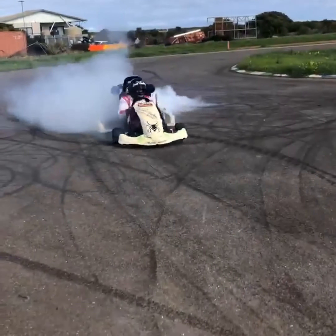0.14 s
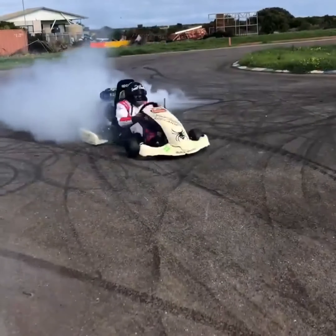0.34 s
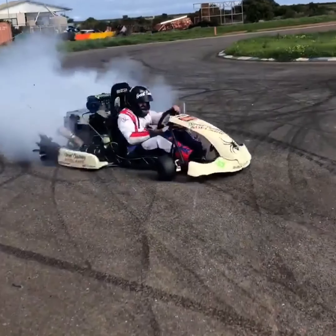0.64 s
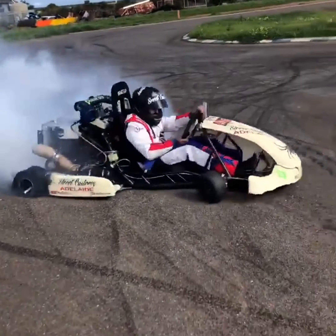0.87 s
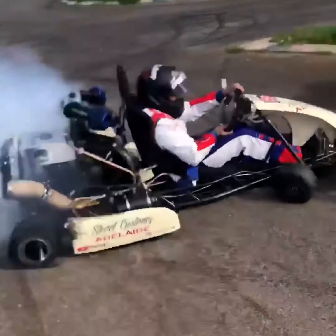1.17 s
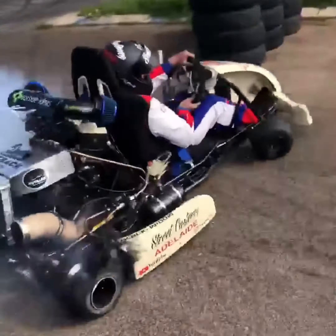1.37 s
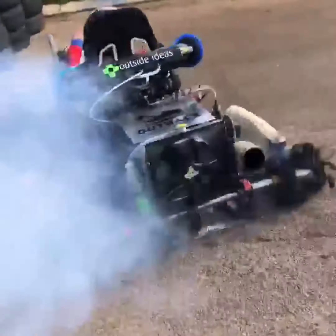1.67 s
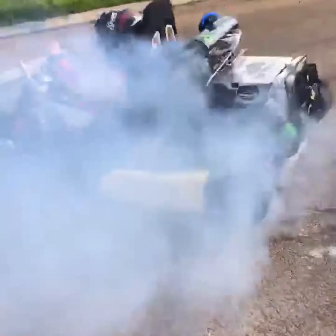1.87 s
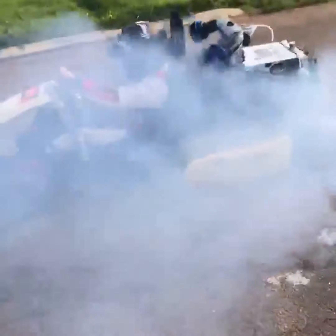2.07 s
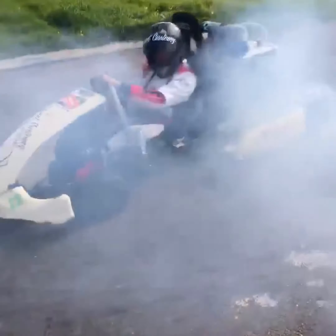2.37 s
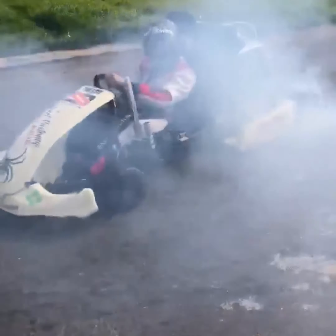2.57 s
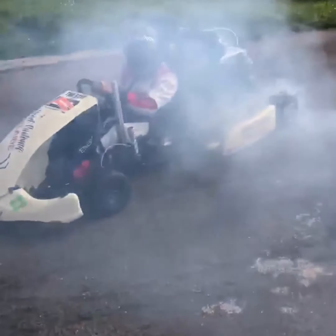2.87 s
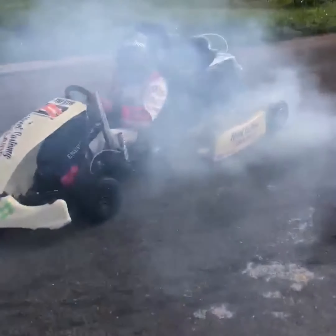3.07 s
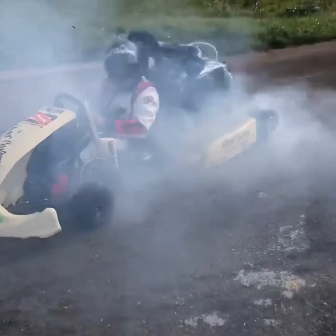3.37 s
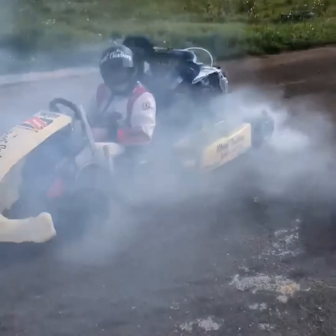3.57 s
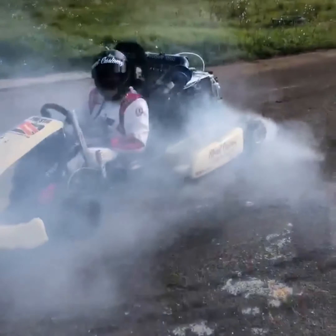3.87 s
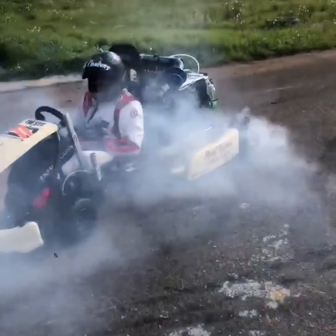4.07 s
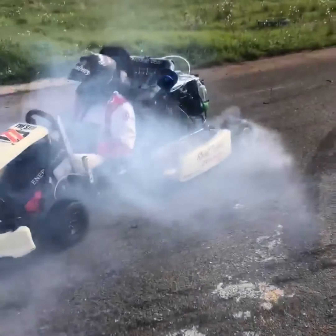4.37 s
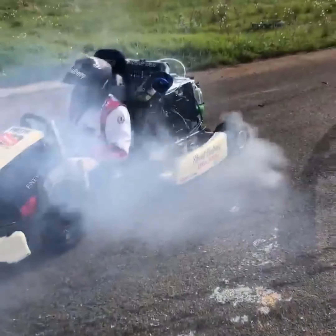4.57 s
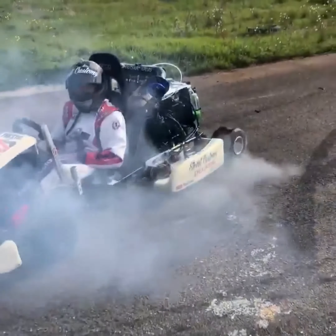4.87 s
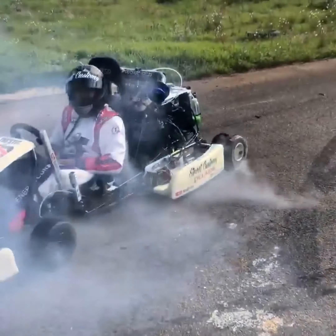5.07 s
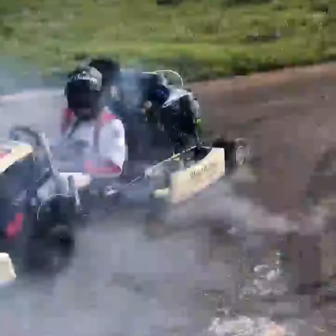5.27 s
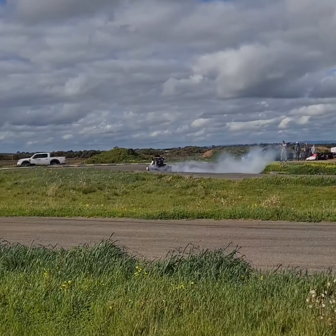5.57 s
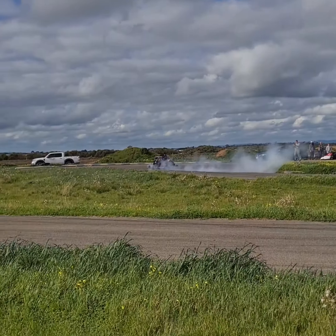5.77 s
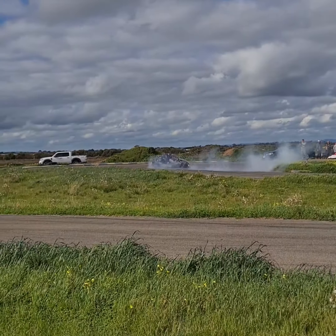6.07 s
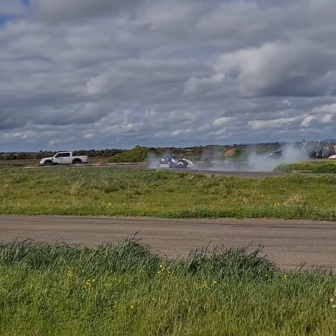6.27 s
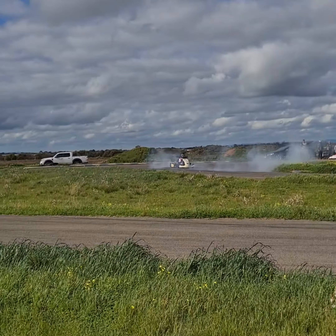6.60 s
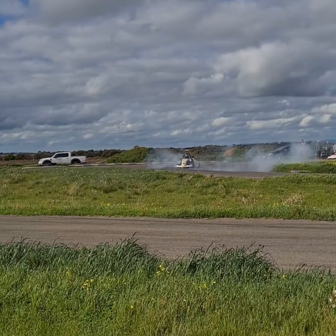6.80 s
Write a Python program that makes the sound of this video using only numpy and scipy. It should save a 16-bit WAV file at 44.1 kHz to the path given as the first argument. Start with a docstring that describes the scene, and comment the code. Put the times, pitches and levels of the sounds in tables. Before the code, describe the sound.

From 0 to 1.1 seconds a four-cylinder kart engine, close on open asphalt, holds a high snarling note that stutters against its rev limiter about ten times a second, each cut with a pop or crack; a deeper backfire thuds near 0.6. Tyres hiss steadily. The throttle shuts and the note sags as the kart sweeps by, loudest and boomiest around 1.3 to 1.7. Four hard blips follow at about 1.7, 2.4, 2.8 and 3.1, raspy and popping on the limiter. From 3.3 the pitch slides down to a low, burbling idle by 4.2, misfiring and chugging after 4.6, with faint scuffs near 5.1. Sound stops at 5.23 for under a tenth of a second. From 5.3 to 6.9, heard in stereo across a field, the engine revs three times, around 5.5, 6.1 to 6.4 and 6.6, lower and duller, with light wind buffeting and grass rustling, strongest near 6.3.

```python
"""Close to the microphone, on asphalt, a four-cylinder go-kart bounces off its rev limiter with pops and tyre hiss.
It sweeps past, is blipped four times and falls to a lumpy idle; a few faint scuffs, then a brief silence.
Last, heard from across a field, it revs three times while light wind buffets two microphone ports and grass rustles.
Firing pulses and harmonics make the engine's note; puffs of filtered noise make its gas; decaying sines
make the thumps of the pops; noise makes their cracks, the tyres, scuffs, wind and grass."""
import sys
import numpy as np
from scipy import signal
from scipy.fft import rfft, irfft
from scipy.io import wavfile
from scipy.ndimage import uniform_filter1d

SR = 44100
rng = np.random.default_rng(int(sys.argv[2]) if len(sys.argv) > 2 else 0)


def pcm_store(signal):
    """Save signal as 16-bit PCM."""
    levels = np.round(np.clip(np.atleast_2d(signal), -1, 1) * 32767)
    wavfile.write(sys.argv[1], SR, levels.astype(np.int16).T)


N = 306054
TIME = np.arange(N) / SR
FREQS = np.fft.rfftfreq(N, 1 / SR)


def amp(db):
    """Decibels to gain."""
    return 10 ** (np.asarray(db) / 20)


def evened(x):
    """Scaled to rms 1."""
    return x / np.sqrt(np.mean(x ** 2) + 1e-20)


def strength(x, size=1500):
    """Running rms over about two windows of this many samples."""
    power = uniform_filter1d(uniform_filter1d(x ** 2, size), size)
    return np.sqrt(abs(power) + 1e-12)


def curves(rows):
    """Each column of a table, joined by straight lines in time."""
    s, *columns = np.transpose(rows)
    return [np.interp(TIME, s, c) for c in columns]


def read(points, hz):
    """A spectrum read on a log-frequency axis."""
    f, value = np.transpose(points)
    return np.interp(np.log(hz + 1), np.log(f), value)


def colour(x, points):
    """Causal (minimum-phase) filter with the given spectrum, so that pulses ring after their start."""
    log_gain = np.log(amp(read(points, abs(np.fft.fftfreq(N, 1 / SR)))))
    response = np.exp(np.conj(signal.hilbert(log_gain)))[:len(FREQS)]
    return irfft(rfft(x) * response, N)


def band(x, lo_hz, hi_hz):
    """Band-pass with smooth skirts."""
    above = 1 + (lo_hz / (FREQS + 1)) ** 12
    below = 1 + (FREQS / hi_hz) ** 12
    return irfft(rfft(x) / above / below, N)


def low_pass(x, edge_hz):
    """Steep band limit on every channel."""
    taps = signal.firwin(401, edge_hz, window=("kaiser", 9), fs=SR)
    return signal.oaconvolve(x, taps[None], "same")


def wander(rate_hz):
    """Smooth random drift of rms 1, slow below this rate."""
    return evened(irfft(rfft(rng.standard_normal(N)) / (1 + (FREQS / rate_hz) ** 4), N))


# The rev limiter's spark cuts. Each row: start in seconds, length in seconds.
SPARK_CUTS = [(0, 0.026), (0.106, 0.021), (0.215, 0.024), (0.315, .022), (0.407, 0.02), (0.493, 0.024),
              (0.572, .018), (0.636, .042), (0.716, .028), (0.791, 0.021), (0.855, .015), (0.915, 0.026),
              (0.997, .02), (1.057, .017), (2.019, 0.029), (2.116, 0.025), (2.53, 0.026), (2.603, .02),
              (2.934, 0.025), (3.012, 0.015), (3.276, .022)]


def spark_cuts(edge_s=0.015):
    """1 while the rev limiter holds the spark off, 0 while the engine fires, with ramped edges."""
    return sum(np.clip(.5 + (length / 2 - abs(TIME - s - length / 2)) / edge_s, 0, 1)
               for s, length in SPARK_CUTS)


# Engine speed where the limiter trips, before the sag. Each row: time in seconds, firings in Hz.
LIMIT = [(0, 436), (.3, 439.8), (.5, 442), (1.1, 440), (2.05, 430.1), (2.2, 428.5), (2.55, 432.8),
         (2.93, 436), (3.03, 422.1), (3.27, 431)]
SAG_HZ_PER_S = 850


def ceiling_rate():
    """Top firing rate, a sawtooth: down during each spark cut, up again until the next."""
    teeth = []
    for s, length in SPARK_CUTS:
        teeth += [(s, 0), (s + length, SAG_HZ_PER_S * length)]
    return curves(LIMIT)[0] - curves(teeth)[0]


# The driver's foot. Each row: opens in seconds, shuts in seconds, opening 0-1, roughness of the firing 0-1.
THROTTLE = [(-.2, 1.121, 0.62, .35), (1.661, 2.207, 0.9, 0.35), (2.359, 2.628, 0.85, 0.59),
            (2.784, 3.027, 0.88, 0.61), (3.14, 3.283, 0.9, 0.53), (3.963, 4.559, 0.13, 0.3),
            (5.441, 5.726, 0.99, 0.34), (6.034, 6.191, 0.76, 0.1), (6.184, 6.385, 0.81, 0.26),
            (6.392, 6.535, 0.44, 0.54), (6.572, 6.845, 0.95, 0.34)]
# The fall to idle, close by. Each row: time in seconds, firings in Hz.
RUNDOWN = [(3.27, 433), (3.36, 349), (3.48, 284), (3.57, 237), (3.67, 195), (3.83, 149), (3.96, 122),
           (4.24, 105), (4.53, 103), (4.62, 86), (4.7, 100), (5.3, 102)]
# The slower revs across the field. Each row: time in seconds, firings in Hz.
FAR_SPEED = [(5.32, 227), (5.364, 202.5), (5.44, 127.7), (5.498, 147.2), (5.55, 160.7), (5.662, 209.8),
             (5.73, 213.6), (5.775, 171.3), (5.85, 118.8), (5.92, 97.45), (6.01, 98.36), (6.082, 129.2),
             (6.154, 133.1), (6.24, 177.3), (6.358, 215.5), (6.398, 205.8), (6.436, 195.2), (6.52, 189.3),
             (6.595, 149.9), (6.638, 162.3), (6.764, 216.1), (6.814, 230.6), (6.87, 223.4), (6.93, 156.2)]
# with the tyres spinning, the firing rate climbs steadily on the throttle and dies away off it
PULL_HZ_PER_S, DRAG_PER_S = 893, 2.37


def speed():
    """Firing rate: climbs on the throttle up to the limiter and coasts off it; later it follows the tables."""
    rate = ceiling = ceiling_rate()
    for opens, shuts, *_ in THROTTLE:
        pulling = np.interp(opens, TIME, rate) + PULL_HZ_PER_S * (TIME - opens)
        pulling = np.minimum(pulling, ceiling)
        coasting = np.interp(shuts, TIME, pulling) * np.exp(-DRAG_PER_S * (TIME - shuts))
        rate = np.select([TIME < opens, TIME < shuts], [rate, pulling], coasting)
    later = curves(list(RUNDOWN) + list(FAR_SPEED))[0]
    return np.where(TIME < RUNDOWN[0][0], rate, later)


def crank(wobble=.004, wobble_hz=45):
    """Firing rate and the running count of firings (four a cycle); the speed wavers a little."""
    rate = speed() * (1 + wobble * wander(wobble_hz))
    return rate, np.cumsum(rate) / SR


def throttle(open_s, shut_s):
    """Load on the engine: it follows the foot with a short lag."""
    load = 0
    for opens, shuts, opening, _ in THROTTLE:
        rise = 1 - np.exp(-np.clip(TIME - opens, 0, shuts - opens) / open_s)
        fall = np.exp(-np.maximum(TIME - shuts, 0) / shut_s)
        load = load + opening * rise * fall
    return load


# Loudness close by; the rows are boom, burble, snarl, bark and rasp.
# Each row: dB coasting at the reference speed, dB per octave of speed, dB more per unit of load,
# dB more on the limiter, share of the kart's nearness.
NEAR_LAW = [(-16.5, 3.5, 3.5, -5, 0.47), (-18.5, 5, -1, 3, 0.58), (-23, 13.5, 15.5, -2, 0.92),
            (-29, 12, 7, -0.5, 0.94), (-56.5, 14.5, 11, -1.5, 0.75)]
# The same from across the field, same columns.
FAR_LAW = [(-20.5, 5.6, 6.4, 0, 0.93), (-24, 9.6, 7, 0, 0.94), (-27, 17.6, 22.5, 0, 0.86),
           (-39, 14, 18, 0, 0.56), (-59.5, 25.4, 19.5, 0, 0.55)]
NEAR_REFERENCE_HZ, FAR_REFERENCE_HZ = 400, 200
# How the pipe favours the firing note. Each row: firings in Hz, level in dB.
PIPE = [(100, -0.5), (135, 0), (190, -2.5), (245, 2), (300, -1.5), (365, -8), (425, -12.5)]
# The kart sweeps past the microphone and turns away. Each row: time in seconds, nearness in dB before its share.
NEARNESS = [(0, 0.5), (.6, 5.5), (1.05, 9), (1.3, 14), (1.65, 17.5), (1.95, 6), (2.13, 1.5), (2.28, -4),
            (2.7, -2.5), (3.25, 0), (3.8, 0), (4.5, 5.5), (4.75, -0.5), (5.23, -4.5), (5.4, 4.5),
            (5.7, -2.5), (6.3, -0.5), (6.94, -5)]
# The engine lopes at low speed, missing firings, heard as dips.
# Each row: centre in seconds, depth in dB (whole in the boom, halved in the other layers).
MISFIRES = [(4.655, 15.5), (4.742, 8), (4.872, 10.5), (4.949, 11.5), (5.031, 10.5), (5.108, 15.5),
            (5.42, 3), (5.82, 10), (5.898, 9.5), (5.965, 20)]
MISFIRE_S = .022  # half length of a dip
ROUGH_LIMITER, ROUGH_OVERRUN = 0.57, 0.73  # roughness, 0-1
LIMIT_RATE, LIMITER_HOLD_S = 390, .1  # firings a second above which the limiter acts; its hold after a cut starts


def effort(rate, law, reference_hz, open_s, shut_s, clean_load=0.22):
    """Gains of boom, burble, snarl, bark and rasp, and the roughness, from speed, load, limiter and nearness."""
    load, nearness = throttle(open_s, shut_s), curves(NEARNESS)[0]
    octaves = np.log2(rate / reference_hz)
    tripped = np.any([(TIME >= s) & (TIME < s + LIMITER_HOLD_S) for s, _ in SPARK_CUTS], axis=0)
    limiting = uniform_filter1d(1. * (tripped & (rate > LIMIT_RATE)), size=600)
    boom_db, *others_db = (
        db + per_octave * octaves + loaded * load + limited * limiting + share * nearness
        for db, per_octave, loaded, limited, share in law)
    lope_db = sum(db * np.exp(-((TIME - s) / MISFIRE_S) ** 2) for s, db in MISFIRES)
    gains = amp([boom_db + read(PIPE, rate) - lope_db, *(db - lope_db / 2 for db in others_db)])

    opens, *_, pulling = np.transpose(THROTTLE)
    pulling_rough = pulling[np.searchsorted(opens, TIME) - 1]
    rough = ROUGH_OVERRUN + np.minimum(load / clean_load, 1) * (pulling_rough - ROUGH_OVERRUN)
    rough = rough + limiting * (ROUGH_LIMITER - rough)
    return gains, np.clip(rough, 0, 1)


# Each cylinder's blow in firing order, before scaling by the imbalance.
# Each row: strength in dB, lateness as a share of one firing.
CYLINDERS = [(4.5, -0.028), (4.5, -0.076), (-1, 0.0055), (-3.5, -0.028)]


def blows(turns, rough, uneven, scatter, jitter, worn=0.45, late_share=0.51):
    """One sharp pulse a firing; in rough running the cylinders differ more, and size and timing scatter."""
    count = np.arange(1, int(turns[-1]))
    size_db, late = np.array(CYLINDERS)[count % len(CYLINDERS)].T
    ragged = np.interp(count, turns, rough)
    imbalance = uneven * (worn + ragged)
    size_chance, time_chance = rng.standard_normal((len(count), 2)).T
    moment = count + late_share * imbalance * late + jitter * ragged * time_chance
    place = np.interp(moment, turns, np.arange(N))
    size = amp(imbalance * size_db) * np.maximum(1 + scatter * ragged * size_chance, 0)
    # short sinc pulses, so that firings may fall between samples
    taps = place.astype(int)[:, None] + np.arange(-8, 9)
    pulses = size[:, None] * np.sinc(taps - place[:, None])
    return np.bincount(np.clip(taps, 0, N - 1).ravel(), pulses.ravel(), N)


def overtones(pulses, rate, turns, size=700):
    """The pulse train without its firing note, which the boom carries."""
    spin = np.exp(2j * np.pi * turns)
    note = uniform_filter1d(uniform_filter1d(pulses / spin, size), size)
    rest = pulses - 2 * (note * spin).real
    return rest / strength(rest)


# Echoes off the asphalt and the bodywork. Each row: gain, mean delay in seconds.
ECHOES = [(.25, .00124), (.2, .0042)]


def bounced(x, drift, drift_hz=3):
    """Echoes whose delays drift at random, so overtones swell and fade a little."""
    for gain, delay_s in ECHOES:
        delay = delay_s * (1 + drift * wander(drift_hz))
        x = x + gain * np.interp(TIME - delay, TIME, x)
    return x


# The resonances shift with engine speed, close by. Each row: firings in Hz, factor on their pitch.
NEAR_SHIFT = [(400, 1.01), (440, 0.97)]
# The same across the field, same columns.
FAR_SHIFT = [(135, 0.79), (185, 0.9), (218, 0.87)]


def shifted(x, rate, tone, shift):
    """The pipe's colour, crossfaded with engine speed between copies shifted in pitch."""
    speeds, factors = np.transpose(shift)
    return sum(np.interp(rate, speeds, share) * colour(x, [(hz * factor, db) for hz, db in tone])
               for share, factor in zip(np.eye(len(shift)), factors))


# How squarely the tailpipe points at the microphone.
# Each row: time in seconds, dB of the rasp and upper snarl, dB more of the rasp's top treble.
AIM = [(0, 2.5, -9), (.45, 12, -7), (1.1, 6, 4.5), (1.82, 0.5, 2.5), (1.92, 3.5, 13), (2.02, -5, 8),
       (2.5, 2.5, -3.5), (3.3, -0.5, 0), (4.8, -5.5, -6.5), (5.4, -3.5, -6), (5.62, 0.5, -7),
       (5.8, -7.5, -26), (6.3, 0, -28.5), (6.9, -5.5, -21)]
# Colour of the pressure pulses leaving the tailpipe, close by. Each row: frequency in Hz, level in dB.
NEAR_SNARL = [(200, -14.5), (400, 1.5), (520, 3), (830, 2.5), (1000, 0), (1270, -3), (1480, -13.5),
              (1700, -10), (2100, -19), (2600, -20), (3050, -24), (3500, -30), (6000, -48)]
# The same from across the field, same columns.
FAR_SNARL = [(200, -33), (340, -7), (420, -3), (620, -3), (800, -4), (950, -7.5), (1150, -4.5), (1320, -4),
             (1600, -10), (2000, -7), (2500, -14), (2950, -29), (3500, -29), (4400, -41), (6000, -52)]


def snarl(rate, turns, rough, tone, shift, uneven, scatter, jitter, drift, aimed_hz=1900):
    """Ringing overtones of the firing pulses; the upper ones swell when the tailpipe points this way."""
    firings = overtones(blows(turns, rough, uneven, scatter, jitter), rate, turns)
    ring = shifted(bounced(firings, drift), rate, tone, shift)
    return ring + (amp(curves(AIM)[0]) - 1) * band(ring, aimed_hz, 20000)


def dulled(x, cut, body_db=-4, treble_db=-14, split_hz=1500):
    """While the spark is off the snarl loses its treble; the pipe keeps the lower overtones ringing."""
    treble = band(x, split_hz, 20000)
    return amp(body_db * cut) * (x - treble) + amp(treble_db * cut) * treble


# Harmonics 1-5 of the firing note. Each entry: relative level in dB.
ORDERS = [0, -6, -5.5, -12, -4.5]
# The silencer close by, used relative to the firing note. Each row: frequency in Hz, level in dB.
NEAR_SILENCER = [(100, 2), (210, -1), (310, -10.5), (420, -31.5), (515, -14), (620, -53), (1000, -61),
                 (2000, -58.5)]
# The same from across the field, same columns.
FAR_SILENCER = [(100, 14.5), (180, 8.5), (265, 15), (400, -14.5), (470, -1), (530, 7), (650, -6),
                (1000, -44), (2000, -40)]
RAGGED_DB = -14  # level of the overtones when the firing is ragged


def boom(rate, turns, rough, silencer, flutter=0.26, even_db=4):
    """The round firing note; its overtones are set by the silencer and fade when the firing is ragged."""
    evenness = amp(np.interp(rough, [.45, ROUGH_OVERRUN], [even_db, RAGGED_DB]))
    note = 0
    for order, db in enumerate(ORDERS, 1):
        passed_db = read(silencer, order * rate) - read(silencer, rate)
        level = amp(db + passed_db) * (evenness if order > 1 else 1)
        note = note + level * np.cos(2 * np.pi * order * turns)
    return np.sqrt(2) * note * (1 + flutter * rough * wander(30))


def stumble(rate, turns, rough, chug=0.29, below_hz=200, span_hz=70):
    """At low speed on a shut throttle unequal firing makes the note chug once a cycle and break up."""
    weak = np.clip((rough - .55) / (ROUGH_OVERRUN - .55), 0, 1) * np.clip((below_hz - rate) / span_hz, 0, 1)
    weak = weak * (TIME > MISFIRES[0][0])
    return 1 + weak * chug * (np.cos(2 * np.pi * turns / len(CYLINDERS)) + wander(35) / 2)


def lumpy(rate, turns, rough, depth=0.58, above_hz=270, span_hz=90):
    """At high speed the unequal cylinders add quarter and half orders around the firing note."""
    cycle = 2 * np.pi * turns / len(CYLINDERS)
    weight = depth * rough * np.clip((rate - above_hz) / span_hz, 0, 1)
    return 1 + weight * (np.cos(cycle + wander(12) / 2) + np.sin(2 * cycle + wander(18) / 2))


def gas(turns, puff_length, steady):
    """Turbulent gas, let out in one decaying puff a firing over a steady flow."""
    return evened((steady + np.exp(-(turns % 1) / puff_length)) * rng.standard_normal(N))


# Colour of the exhaust gas close by. Each row: frequency in Hz, relative level in dB per Hz.
NEAR_COLOUR = [(250, -18), (400, 13.5), (500, -1), (700, 11), (850, 5.5), (1050, 3), (1300, 0), (1520, -7),
               (1750, -11), (2650, -16), (3300, -17.5), (5500, -28.5), (6400, -37), (8800, -40.5)]
# The same from across the field, same columns.
FAR_COLOUR = [(150, 0.5), (280, -13), (420, 23.5), (620, 28), (800, 31), (950, 17), (1250, 28.5), (1600, 2),
              (1950, -4.5), (2600, -2), (3000, -7.5), (3600, -11.5), (5000, -11.5), (7300, -1.5),
              (9000, -18), (14000, -21), (16000, -76)]
# Colour of the burble, near and far. Each row: frequency in Hz, relative level in dB per Hz.
BURBLE_COLOUR = [(25, -34), (50, -19.5), (80, -10), (120, 6), (170, -4.5), (230, 7.5), (300, 1), (360, -8),
                 (430, -29), (900, -72)]
BARK_BAND_HZ = 480, 2000  # where the bark's strength is taken


def exhaust(gains, rough, rate, turns, snarling, tone, silencer, puff_length, steady, split_hz=1550,
            bark_cut_db=-2, rasp_cut_db=-8, beam_hz=4800, bark_low_hz=380):
    """Boom and snarl of the firings, with burble, bark and rasp of the gas; roughness adds burble and bark."""
    boom_gain, burble_gain, snarl_gain, bark_gain, rasp_gain = gains
    aim, top_aim = amp(curves(AIM))
    puffs = colour(gas(turns, puff_length, steady), tone)
    bark = band(puffs, bark_low_hz, split_hz)
    bark = bark / strength(band(bark, *BARK_BAND_HZ))
    rasp = band(puffs, split_hz, 20000)
    rasp = rasp / strength(band(rasp, 2400, 5100))
    rasp = rasp + (top_aim - 1) * band(rasp, beam_hz, 20000)  # the top leaves the pipe as a beam
    burble = colour(gas(turns, puff_length, steady), BURBLE_COLOUR)  # uneven burning rumbles in the pipe
    burble = burble / strength(burble)
    cut, uneven = spark_cuts(), stumble(rate, turns, rough)
    note = boom(rate, turns, rough, silencer) * lumpy(rate, turns, rough)
    return (boom_gain * uneven * note
            + burble_gain * rough * burble
            + snarl_gain * uneven * dulled(snarling, cut)
            + bark_gain * rough * amp(bark_cut_db * cut) * bark
            + rasp_gain * aim * amp(rasp_cut_db * cut) * rasp)


# The spinning tyres scrub the asphalt. Each row: time in seconds, level in dB.
TYRES = [(0, -40.5), (1.1, -40.5), (1.4, -43.5), (1.75, -44), (2.3, -57.5), (3.3, -53.5), (3.9, -71.5)]
# Colour of the tyres. Each row: frequency in Hz, relative level in dB per Hz.
TYRE_COLOUR = [(600, -24.5), (1500, 4), (2600, -4), (4000, -6.5), (6000, -13.5), (8800, -19)]


def tyres(flutter_db=1.6, flutter_hz=40):
    """Fluttering hiss of rubber sliding on asphalt, loudest at first."""
    hiss = evened(colour(rng.standard_normal(N), TYRE_COLOUR))
    return amp(curves(TYRES)[0] + flutter_db * wander(flutter_hz)) * hiss


def swing(s, db, hz, rise_cycles):
    """A few dying swings of the pipe's air column."""
    cycles = np.maximum(TIME - s, 0) * hz
    swell = cycles / rise_cycles * np.exp(1 - cycles / rise_cycles)
    return -amp(db) * swell * np.sin(2 * np.pi * cycles)


# Unburnt fuel pops in the pipe.
# Each row: start in seconds, thump in dB, crack in dB (both relative, lowered by pops()).
POPS = [(0.021, -19, -35), (0.118, -19, -17), (0.238, -8.5, -16), (0.328, -12, -12.5), (0.431, -9, -16),
        (0.512, -10, -16), (0.577, -9, -15), (0.625, 0.5, -18.5), (0.709, -7, -17), (0.744, -1.5, -30),
        (0.809, -5.5, -12.5), (0.877, -3, -13.5), (0.947, 0, -10.5), (1.012, -6, -18), (1.077, -18, -15),
        (1.657, -2, -18), (2.025, -1, -14), (2.048, -3, -27), (2.128, -5, -15), (2.195, -11.5, -42),
        (2.299, -17, -20), (2.553, -10, -19.5), (2.737, -15.5, -21), (2.939, -10, -25), (3.001, -9.5, -42),
        (3.298, -5.5, -23.5), (3.653, -17, -33.5), (3.804, -19, -31.5), (4.759, -14.5, -54),
        (5.122, -15, -40), (5.213, -16, -43)]
# One deep backfire: start in seconds, level in dB, pitch in Hz.
BANG = (.628, -9, 68)
POP_RING_HZ, POP_OVER_FIRING = 210.8, 1.43  # a pop's mean pitch; at low speed, a multiple of the firing note


def pops(rate, level_db=-3, rise_cycles=0.97, crack_db=-2, crack_s=0.017, swell_s=0.00087, crack_hz=3200,
         slow_crack_hz=1350, brightening=3, spread=0.16):
    """Each pop is a thump with a short crack of gas, duller the slower the engine turns."""
    ring = np.minimum(POP_RING_HZ, POP_OVER_FIRING * rate)
    detune = np.exp(spread * rng.standard_normal(len(POPS)))
    thumps = sum(swing(s, db, np.interp(s, TIME, ring) * c, rise_cycles) for (s, db, _), c in zip(POPS, detune))
    cracks = sum(amp(db) * np.clip((TIME - s) / swell_s, 0, 1) * np.exp(-abs(TIME - s) / crack_s)
                 for s, _, db in POPS)
    hiss = colour(rng.standard_normal(N), NEAR_COLOUR)
    crackle = evened(irfft(rfft(hiss) / (1 + (FREQS / crack_hz) ** 2), N))
    dull = band(crackle, 100, slow_crack_hz)
    crackle = dull + np.minimum(rate / LIMIT_RATE, 1) ** brightening * (crackle - dull)
    return amp(level_db) * thumps + amp(crack_db) * cracks * crackle + swing(*BANG, rise_cycles=0.54)


# A faint rustle close to the microphone.
# Each row: centre in seconds, level in dB, half length in seconds.
RUSTLES = [(5.075, -60.5, 0.017), (5.111, -51, 0.0066), (5.153, -57, 0.0092), (5.19, -59.5, 0.029)]
# Colour of the rustle. Each row: frequency in Hz, relative level in dB per Hz.
RUSTLE_COLOUR = [(400, -19), (750, 6), (1300, -2), (2300, -9), (5000, -20.5), (8800, -25)]


def rustle(grain_db=4, grain_hz=250):
    """A few faint scuffs of noise, grainy from a fast random level."""
    level = sum(amp(db) * np.exp(-((TIME - s) / half) ** 2) for s, db, half in RUSTLES)
    grains = amp(grain_db * wander(grain_hz)) * rng.standard_normal(N)
    return level * evened(colour(grains, RUSTLE_COLOUR))


def rounded(x):
    """The microphone rounds off the loudest peaks."""
    return x / (1 + (x / .76) ** 6) ** (1 / 6)


# How alike the two microphone ports hear. Each row: frequency in Hz, likeness 0-1.
PORT_LIKENESS = [(30, .6), (100, .985), (220, .992), (500, .975), (1100, .955), (2200, .75), (4500, .68),
                 (8000, .6), (13000, .45)]


def two_ports(x):
    """Two microphone ports: alike in the middle range, less so in the treble and the deepest bass."""
    same = np.clip(read(PORT_LIKENESS, FREQS), 0, 1)
    scattered = evened(rng.standard_normal(600)) / np.sqrt(600)
    side = irfft(rfft(x) * rfft(scattered, N) * np.sqrt((1 - same) / (1 + same)), N)
    return np.array([x + side, x - side])


# Gusts on the microphone over a steady breeze.
# Each row: centre in seconds, level in dB before wind()'s own level, half length in seconds.
GUSTS = [(5.355, -23.5, .02), (5.753, -25, 0.046), (6.39, -20, .02), (6.468, -15, 0.027),
         (6.649, -22, 0.039), (6.85, -27.5, 0.12)]
# Colour of the buffeting. Each row: frequency in Hz, relative level in dB per Hz.
WIND_COLOUR = [(15, -34), (35, -12), (65, 13.5), (100, -1), (200, 4), (600, -64)]
# Grass rustling in the field. Each row: time in seconds, level in dB.
GRASS = [(5.32, -43.5), (5.6, -34.5), (6.0, -35), (6.25, -26), (6.5, -45), (6.94, -46.5)]
# Colour of the grass. Each row: frequency in Hz, relative level in dB per Hz.
GRASS_COLOUR = [(200, 10.5), (1000, -8), (2500, -16.5), (5000, -21.5), (7500, -22.5), (9000, -33.5),
                (14000, -39), (16000, -47)]
BREEZE_DB = -36  # median, before wind()'s own level
WINDWARD_DB = 1  # the left port catches more wind than the right (dB each way)


def wind(level_db=-2, apart=0.95, swell_db=3, swell_hz=6):
    """Gusts buffet each microphone port differently, and the grass rustles."""
    shared, own = (evened(colour(rng.standard_normal(N), WIND_COLOUR)) for _ in range(2))
    buffet = np.array([shared + apart * own, shared - apart * own])
    breeze = amp(BREEZE_DB + swell_db * wander(swell_hz))
    force = breeze + sum(amp(db) * np.exp(-((TIME - s) / half) ** 2) for s, db, half in GUSTS)
    port_gain = amp(level_db + np.array([[WINDWARD_DB], [-WINDWARD_DB]]))
    grass = evened(colour(rng.standard_normal(N), GRASS_COLOUR))
    return port_gain * force * buffet + amp(curves(GRASS)[0]) * two_ports(grass)


NEAR_END, FAR_START, FADE_S = 5.233, 5.317, .004  # seconds
NEAR_EDGE_HZ, EDGE_HZ = 9100, 15700  # band limits, close by and overall


def scene():
    """The kart close by, in mono and a little dull; a silence; the kart across the field, in stereo."""
    rate, turns = crank()
    gains, rough = effort(rate, NEAR_LAW, NEAR_REFERENCE_HZ, open_s=0.0069, shut_s=0.011)
    snarling = snarl(rate, turns, rough, NEAR_SNARL, NEAR_SHIFT,
                     uneven=0.9, scatter=0.3, jitter=0.011, drift=0.2)
    near = exhaust(gains, rough, rate, turns, snarling, NEAR_COLOUR, NEAR_SILENCER, puff_length=0.6, steady=0.4)
    near = rounded(near + tyres() + pops(rate) + rustle())
    close = low_pass(near[None], NEAR_EDGE_HZ) * np.clip((NEAR_END - TIME) / FADE_S, 0, 1)

    gains, rough = effort(rate, FAR_LAW, FAR_REFERENCE_HZ, open_s=0.027, shut_s=0.031)
    snarling = snarl(rate, turns, rough, FAR_SNARL, FAR_SHIFT,
                     uneven=0.45, scatter=0.25, jitter=0.012, drift=0.25)
    far = exhaust(gains, rough, rate, turns, snarling, FAR_COLOUR, FAR_SILENCER, puff_length=0.5, steady=0.3)
    distant = (two_ports(far) + wind()) * np.clip((TIME - FAR_START) / FADE_S, 0, 1)
    return close + distant


def record(dry):
    """The recorder's band limit."""
    return low_pass(dry, EDGE_HZ)


dry = scene()
out = record(dry)
pcm_store(out)
```